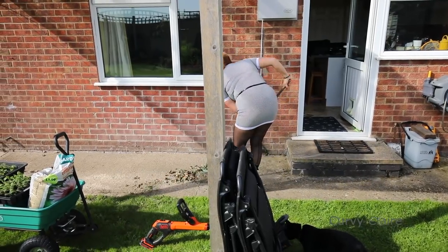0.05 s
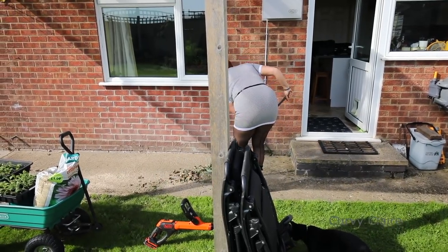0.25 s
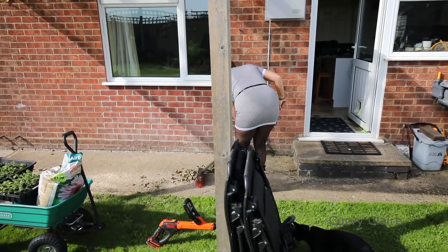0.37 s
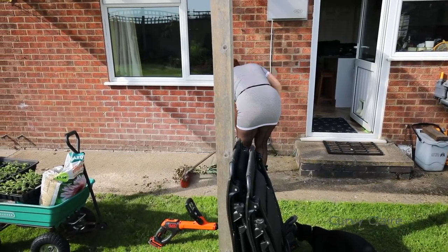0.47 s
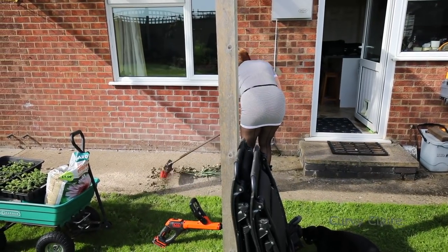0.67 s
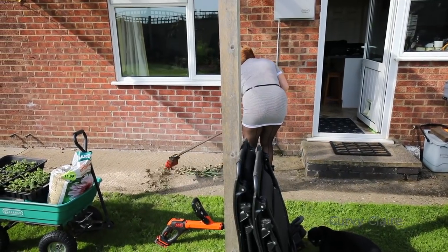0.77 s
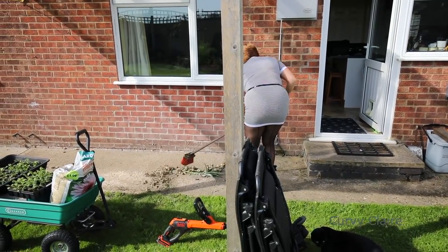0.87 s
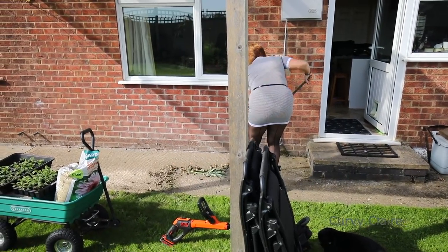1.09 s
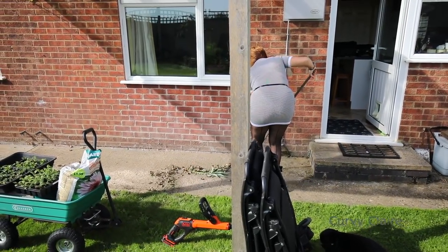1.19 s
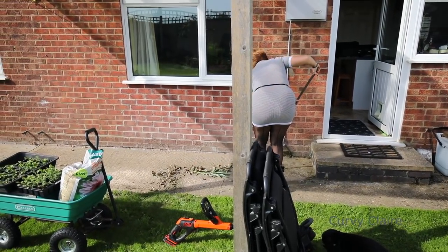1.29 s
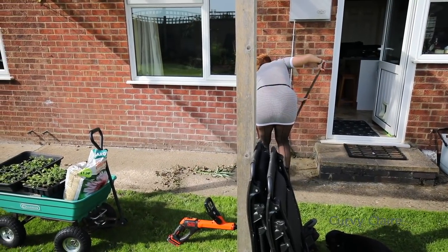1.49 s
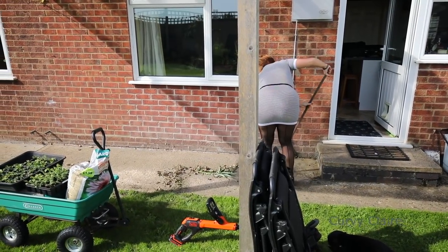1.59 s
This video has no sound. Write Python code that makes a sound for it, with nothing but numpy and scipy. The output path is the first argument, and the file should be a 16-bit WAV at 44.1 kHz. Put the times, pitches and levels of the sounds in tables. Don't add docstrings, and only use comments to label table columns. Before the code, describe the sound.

A stiff broom scrapes a concrete path by a house wall, a few metres from a stereo microphone. A shoe scuffs at 0.13 s, the head knocks down at 0.22, and a crisp, gritty push runs from 0.3 to 0.7. A tick and weaker skipping drag fade by 1.1. A hollow wooden tap comes at 1.36, then a very faint distant hoot near 1.5, over quiet air and low engine drone.

```python
import sys
import numpy as np
from scipy import signal
from scipy.fft import rfft, irfft, next_fast_len
from scipy.io import wavfile

SR = 44100
rng = np.random.default_rng(int(sys.argv[2]) if len(sys.argv) > 2 else 0)


def generate_wav(signal):
    frames = np.transpose(np.atleast_2d(signal))
    scaled = np.clip(frames, -1, 1) * 32767
    pcm = np.round(scaled).astype(np.int16)
    wavfile.write(sys.argv[1], SR, pcm)


def gain_from_decibels(decibels):
    exponent = np.asarray(decibels, float) / 20
    return 10 ** exponent


N = 72765


def rms_one(x):
    return x / np.sqrt(np.mean(x ** 2) + 1e-20)


def in_time(rows, column=1):
    rows = np.array(rows)
    return np.interp(np.arange(N) / SR, rows[:, 0], rows[:, column], left=-120, right=-120)


def shape(x, points, phase=None):
    size = next_fast_len(N + 4096)
    hz = np.maximum(np.arange(size // 2 + 1) * SR / size, 10)
    points = np.array(points)
    response = gain_from_decibels(np.interp(np.log(hz), np.log(points[:, 0]), points[:, 1]))
    response = response * (hz < 15800) * (hz > 20)
    if phase is not None:
        response = response * np.exp(1j * np.interp(hz, *np.transpose(phase)))
    return irfft(rfft(x, size) * response, size)[:N]


def drift(rate_hz):
    r = np.exp(-2 * np.pi * rate_hz / SR)
    noise = rng.standard_normal(N + SR)
    return rms_one(signal.lfilter([1], [1, -2 * r, r * r], noise)[SR:])


def click_at(s, height=1.0):
    return height * (np.arange(N) == int(s * SR))


def ring(clicks, hz, t60):
    r = gain_from_decibels(-60 / (t60 * SR))
    w = 2 * np.pi * hz / SR
    return signal.lfilter([0, np.sin(w)], [1, -2 * r * np.cos(w), r * r], clicks + 1e-18)


def grains(per_s, spread_db):
    sizes = gain_from_decibels(spread_db * np.minimum(rng.exponential(1, N), 4)) * rng.choice([-1, 1], N)
    return rms_one(sizes * (rng.random(N) < per_s / SR))


def bristles():
    ring_cycles, ring_share = 8.6, 0.37
    patch_db, patch_hz = 1, 17
    slips = grains(per_s=16000, spread_db=2)
    tuft_of_slip = rng.integers(0, 16, N)
    rung = 0
    for tuft, hz in enumerate(np.geomspace(900, 15000, num=16)):
        tuft_ring = ring(slips * (tuft_of_slip == tuft), hz, ring_cycles / hz)
        rung = rung + tuft_ring * np.sqrt(hz) * gain_from_decibels(patch_db * drift(patch_hz))
    tips = (1 - ring_share) * slips + ring_share * rms_one(rung)
    return rms_one(tips + gain_from_decibels(-20) * grains(per_s=450, spread_db=2.3))


def stroke(x):
    # time in seconds, level in dB.
    push = [(.24, -53.5), (.29, -40.5), (.348, -34.5), (.465, -35), (.5, -30), (.56, -31.5), (.63, -33.5),
            (.682, -39), (.725, -47.5)]
    # time in seconds, level in dB.
    drag = [(.725, -46.5), (.76, -42.5), (.79, -41.5), (.82, -37), (.85, -45), (.89, -48), (.945, -51.5),
            (1.0, -51), (1.15, -64.5)]
    # start in seconds, hiss level in dB, attack in seconds, decay t60 in seconds.
    skips = [
        (0.2158, -41.5, 0.0018, 0.1),
        (.415, -43, 0.015, 0.13),
        (.746, -48, .003, 0.1),
        (0.903, -48.5, 0.0034, 0.082),
        (.953, -43.5, 0.0083, 0.083),
    ]
    # frequency in Hz, gain in dB.
    far_colour = [(600, -2.5), (1500, -1), (3300, -3.5), (4400, 2), (5300, 1), (6500, 3), (9000, 0.5),
                  (15000, -7.5)]
    swing_start_s, swing_end_s = 0.35, 0.77
    t = np.arange(N) / SR
    level = gain_from_decibels(in_time(push)) + gain_from_decibels(in_time(drag))
    for s, db, attack, t60 in skips:
        decay = gain_from_decibels(db - 60 * np.maximum(t - s - attack, 0) / t60)
        level = level + decay * np.clip((t - s) / attack, 0, 1)
    far = np.clip((t - swing_start_s) / (swing_end_s - swing_start_s), 0, 1)
    return level * (x + far * (shape(x, far_colour) - x))


def broom():
    # frequency in Hz, level in dB per Hz.
    left_port = [(400, -31), (1000, -14), (3300, -6.5), (4500, 1.5), (5400, 1.5), (6600, 1), (9800, -11.5),
                 (15500, -11.5)]
    right_port = [(500, -20.5), (1000, -13.5), (1600, 1), (2500, -1), (3700, 6), (7000, 0.5), (10000, -6.5),
                  (13500, -3.5)]
    # frequency in Hz, phase in radians.
    port_phase = [(0, 0), (2900, .3), (3900, 1.3), (5200, 2.2), (5650, 3.14), (6300, 4.7), (8000, 5.4),
                  (16000, 5.8)]
    # frequency
    # in Hz, level in dB.
    diffuse = [(500, -2), (1500, -8), (3300, -4), (5600, -11), (7500, -4), (9800, 1), (11500, -3),
               (14000, 3)]
    # frequency in Hz, level in dB, t60 in seconds.
    hum_modes = [(554, -32, .05), (1184, -38.5, 0.037), (1733, -29, 0.04), (3600, -22.5, 0.0079),
                 (4550, -30, 0.022)]
    # frequency in Hz, gain in dB.
    narrow_lift = [(5620 - 280, 0), (5620, 3), (5620 + 280, 0)]
    direct = bristles()
    heard_left, heard_right = [stroke(direct + shape(bristles(), diffuse)) for side in range(2)]
    left = shape(heard_left, left_port, port_phase)
    right = shape(shape(heard_right, right_port), narrow_lift)
    rubbed = stroke(direct)
    hum = 0
    for hz, db, t60 in hum_modes:
        evened = ring(rubbed, hz, t60) * np.sqrt(30 / (t60 * SR))
        hum = hum + gain_from_decibels(db + 2 * drift(16)) * evened
    return gain_from_decibels(5.0) * (np.array([left, right]) + hum * gain_from_decibels(np.array([[-7.0], [0]])))


def knocks(hits, modes, contact_hz):
    s, db = np.transpose(hits)
    out = 0
    for hz, level_db, t60 in modes:
        clicks = np.zeros(N)
        clicks[(s * SR).astype(int)] = gain_from_decibels(db + level_db - 8 + 2 * rng.standard_normal(len(s)))
        no_thump = signal.butter(1, hz / 4, "high", fs=SR, output="sos")
        out = out + signal.sosfilt(no_thump, ring(clicks, hz, t60))
    return signal.sosfilt(signal.butter(2, contact_hz, fs=SR, output="sos"), out)


def landing():
    # time in seconds, peak level in dB.
    land_hits = [
        (.218, -33),
        (.2205, -26.5),
        (.225, -32),
        (.233, -32.5),
    ]
    # frequency in Hz, level in dB, t60 in seconds.
    head = [(65, -5, 0.067), (364, -8, 0.014), (470, -5.5, 0.014), (549, -6.5, 0.07), (1713, 0, 0.024),
            (2100, -1, 0.017), (3730, -5, .012)]
    return knocks(land_hits, head, contact_hz=5000)


def tap():
    # time in seconds, peak level in dB, frequency in Hz, t60 in seconds.
    touches = [(1.3577, -29, 1374, 0.0084), (1.3633, -41, 1060, 0.0074), (1.3645, -43, 3240, 0.0068),
               (1.3584, -41.5, 3900, 0.0028), (1.3598, -38, 2350, 0.0037), (1.3590, -40.5, 600, .008),
               (1.3655, -44, 1450, 0.0062), (1.378, -43, 642, 0.015), (1.381, -44.5, 1550, 0.016),
               (1.387, -46.5, 451, 0.019)]
    out = 0
    for s, db, hz, t60 in touches:
        twice = ring(ring(click_at(s), hz, t60), hz, t60)
        out = out + gain_from_decibels(db) * twice / np.abs(twice).max()
    return out


def scatter():
    # time in seconds, level in dB.
    tail = [(1.359, -64), (1.363, -40.5), (1.372, -51), (1.381, -47.5), (1.39, -53), (1.42, -58)]
    # frequency in Hz, level in dB per Hz.
    tail_colour = [(200, -18), (400, 0), (700, -3), (1500, -4.5), (2300, -14), (3300, -7), (5000, -16),
                   (9000, -33)]
    mid, side = [rms_one(shape(grains(6000, 2.0), tail_colour)) for k in range(2)]
    return gain_from_decibels(in_time(tail)) * (mid + 0.5 * side * np.array([[1], [-1]]))


def scuff():
    # time in seconds, peak level in dB.
    scuff_hits = [(.134, -38), (.137, -31.5), (.1452, -29), (.155, -37), (.160, -32.5), (.167, -36),
                  (.173, -41), (.177, -37)]
    # frequency in Hz, level in dB, t60 in seconds.
    sole = [(356, -11.5, 0.089), (470, -6.5, 0.036), (552, -1, 0.051), (830, -6, 0.014),
            (1146, -0.5, 0.021)]
    return knocks(scuff_hits, sole, contact_hz=1600)


def ticks():
    # time in seconds, peak level in dB, frequency in Hz, t60 in seconds.
    grit = [
        (.7475, -31, 4200, .005),
        (1.028, -52, 14100, .02),
        (1.028, -56, 12500, .006),
        (.889, -56, 13500, .006),
    ]
    return sum(ring(click_at(s, gain_from_decibels(db)), hz, t60) for s, db, hz, t60 in grit)


def placed(x, pan_db):
    echo = np.roll(x, int(0.0054 * SR)) * gain_from_decibels(-17)
    return x * gain_from_decibels(np.array([[pan_db], [-pan_db]]) / 2) + echo * np.array([[1], [-0.6]])


def drone():
    # time in seconds, level of the fundamental in dB, level of its octave in dB.
    drone_levels = [(0.0, -68, -90), (0.128, -57.5, -58), (0.642, -52.5, -54.5), (0.702, -48, -76),
                    (0.904, -62.5, -86), (0.942, -64, -56), (1.028, -66, -94), (1.116, -68, -69),
                    (1.162, -72, -88), (1.254, -84, -83), (1.452, -57, -70), (1.506, -75, -73),
                    (1.544, -56, -70), (1.65, -74, -67)]
    hz = 62 * (1 + 0.019 * drift(2.7))
    turn = 2 * np.pi * np.cumsum(hz) / SR
    low, high = [gain_from_decibels(np.maximum(in_time(drone_levels, column), -90) + 3) for column in (1, 2)]
    return low * np.sin(turn) + gain_from_decibels(-4.5) * high * np.sin(2 * turn)


def coo():
    start_s, length_s, hz, db = 1.45, 0.14, 540, -56
    t = np.arange(N) / SR - start_s
    swell = np.sin(np.pi * np.clip(t / length_s, 0, 1))
    return gain_from_decibels(db) * swell * np.sin(2 * np.pi * hz * t)


def air():
    # frequency in Hz, level in dB per Hz.
    mid_colour = [(15, -41), (25, -0.5), (126, -3), (335, -6), (394, -7), (1010, -4), (1840, -12.5),
                  (6030, -17), (16000, -47.5)]
    side_colour = [(15, -42), (25, -7), (175, -6), (285, -16), (335, -9.5), (404, -10.5), (1040, -12),
                   (13900, -31.5), (16000, -78)]
    lean_db, lean_top_hz, hiss_db = 4.5, 3600, -61.5
    mid = gain_from_decibels(-52 + 0.24 * drift(1.6)) * rms_one(shape(rng.standard_normal(N), mid_colour))
    side = gain_from_decibels(-56.5 + 0.6 * drift(4.9)) * rms_one(shape(rng.standard_normal(N), side_colour))
    left_lean, right_lean = [[(200, 0), (400, db), (lean_top_hz, db), (lean_top_hz, 0)]
                             for db in (lean_db / 2, -lean_db / 2)]
    garden = np.array([shape(mid + side, left_lean), shape(mid - side, right_lean)])
    return garden + gain_from_decibels(hiss_db) * rng.standard_normal((2, N))


def scene():
    hits = placed(scuff(), pan_db=-8.5) + placed(landing(), pan_db=-8.0)
    hits = hits + placed(tap(), pan_db=-9.5) + placed(ticks(), pan_db=-10)
    engine = drone() * gain_from_decibels(np.array([[0.6], [-0.6]]))
    return broom() + hits + scatter() + engine + coo() + air()


def low_pass(x):
    return signal.sosfilt(signal.butter(12, 16100, fs=SR, output="sos"), x)


def record(dry):
    cut = signal.sosfilt(signal.butter(2, 32, "high", fs=SR, output="sos"), dry)
    cut = signal.sosfilt(signal.cheby2(20, 40, 15800, fs=SR, output="sos"), cut)
    return low_pass(cut)


dry = scene()
out = record(dry)
generate_wav(out)
```